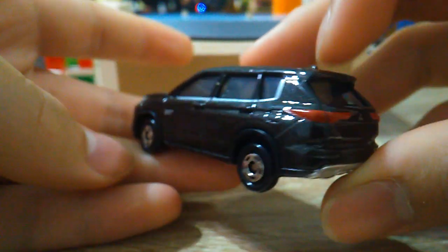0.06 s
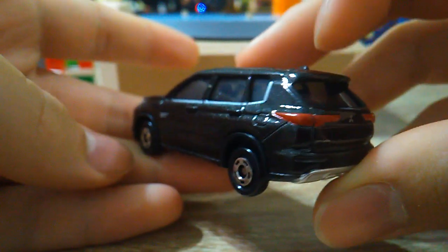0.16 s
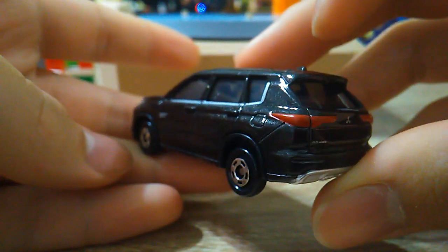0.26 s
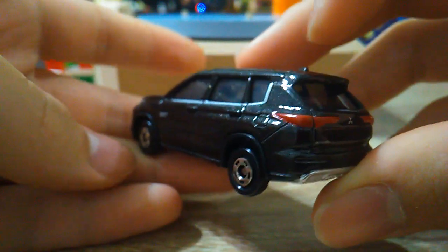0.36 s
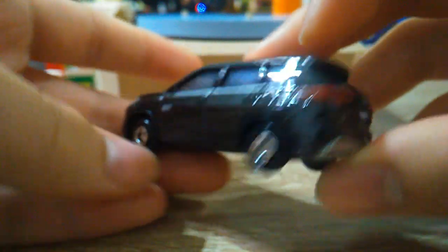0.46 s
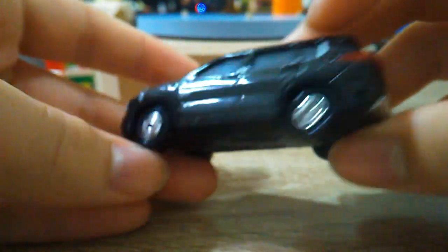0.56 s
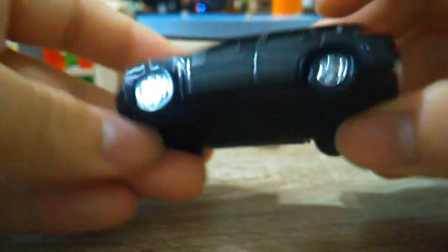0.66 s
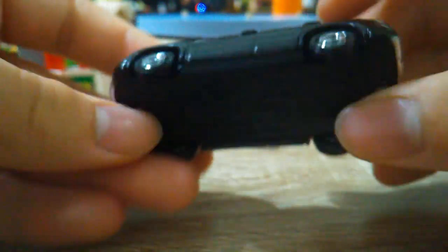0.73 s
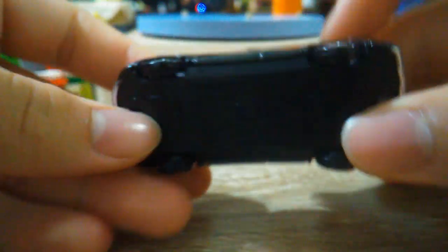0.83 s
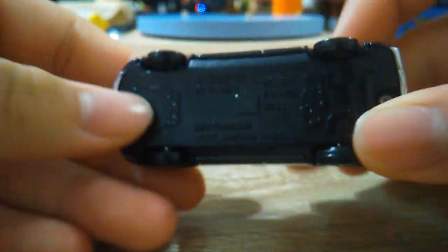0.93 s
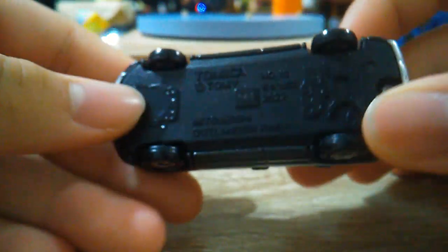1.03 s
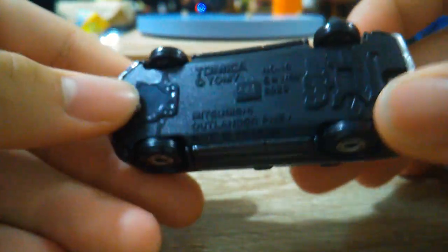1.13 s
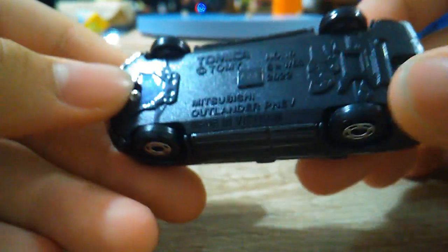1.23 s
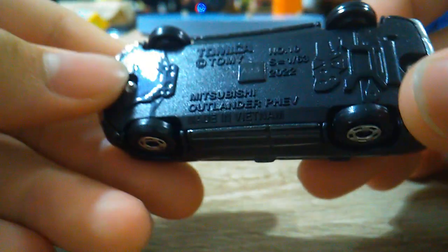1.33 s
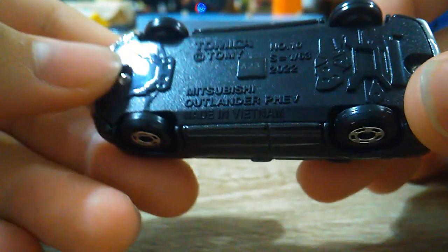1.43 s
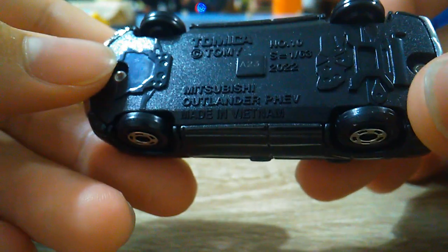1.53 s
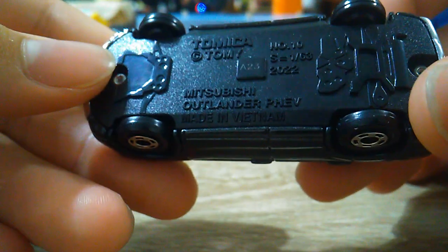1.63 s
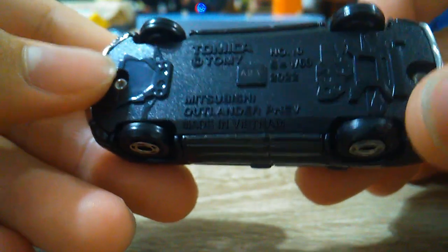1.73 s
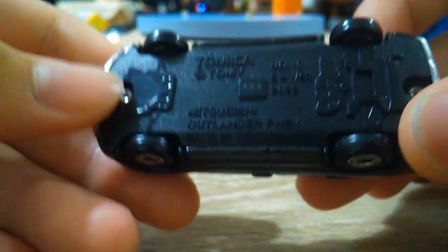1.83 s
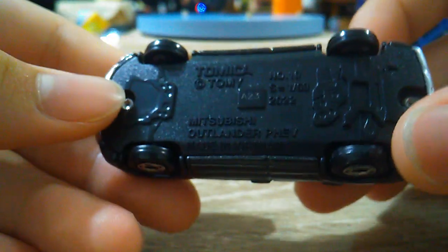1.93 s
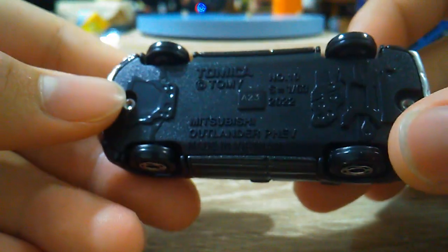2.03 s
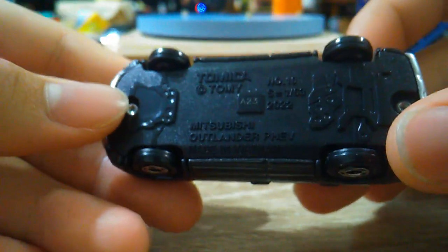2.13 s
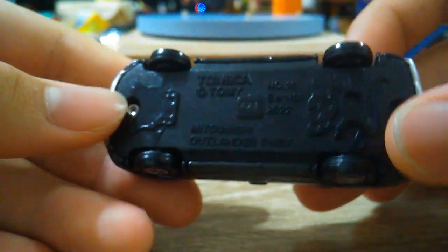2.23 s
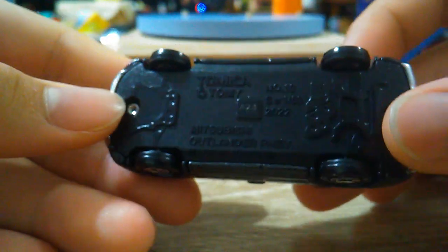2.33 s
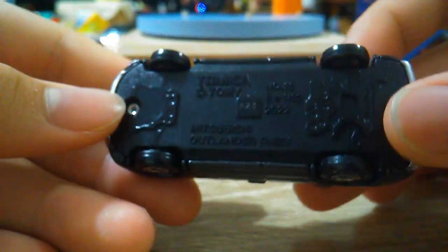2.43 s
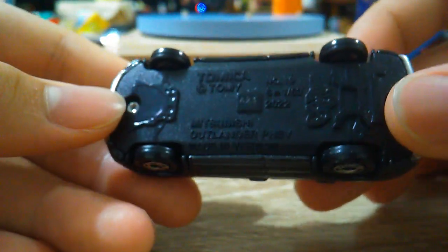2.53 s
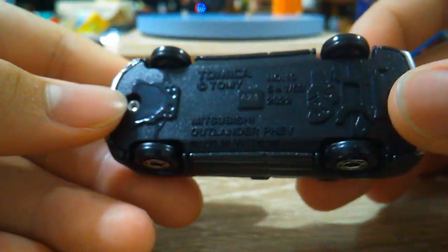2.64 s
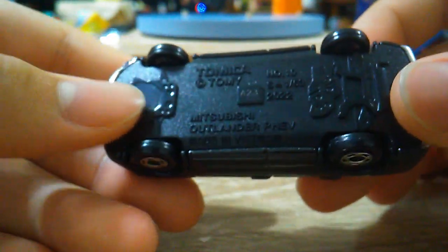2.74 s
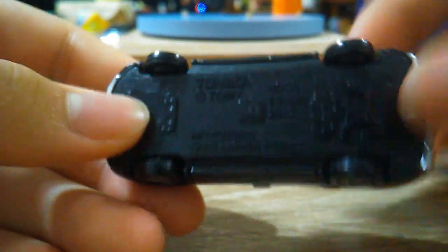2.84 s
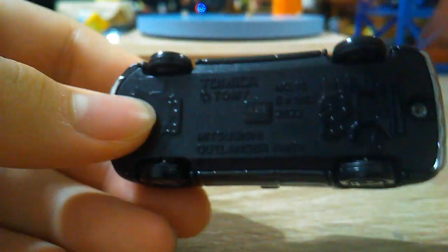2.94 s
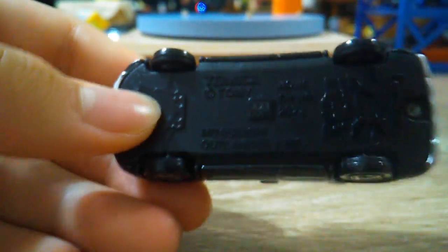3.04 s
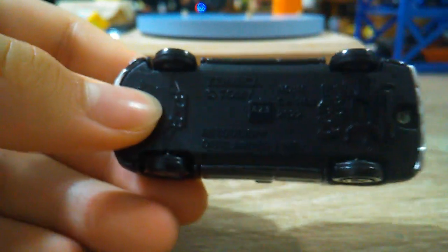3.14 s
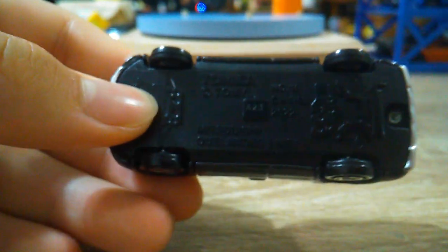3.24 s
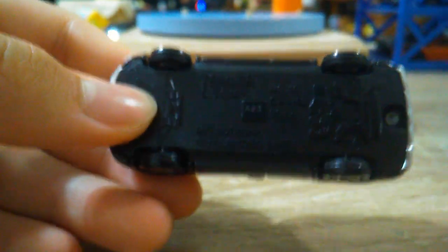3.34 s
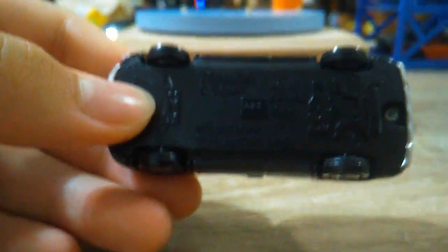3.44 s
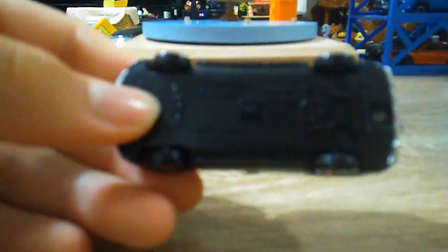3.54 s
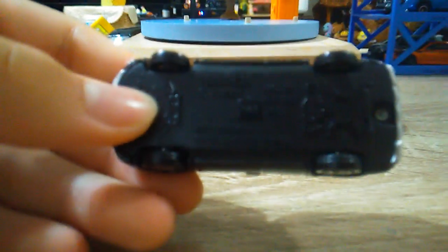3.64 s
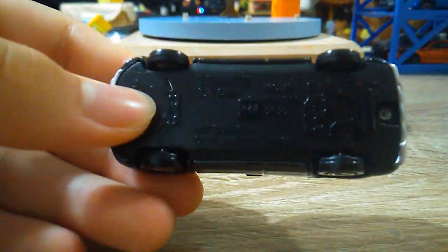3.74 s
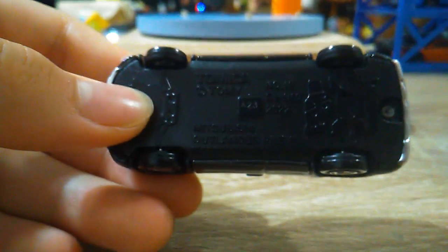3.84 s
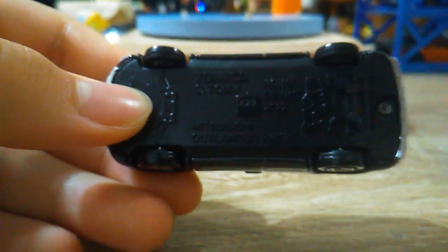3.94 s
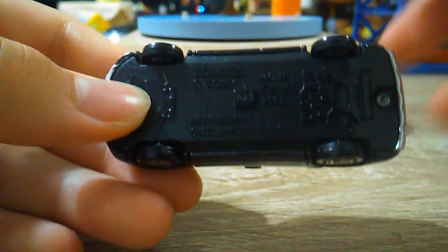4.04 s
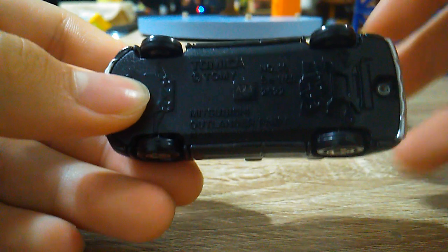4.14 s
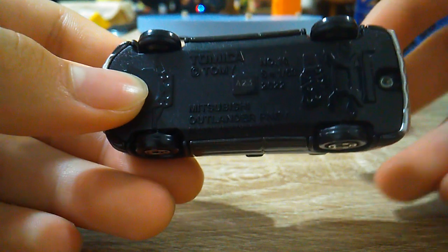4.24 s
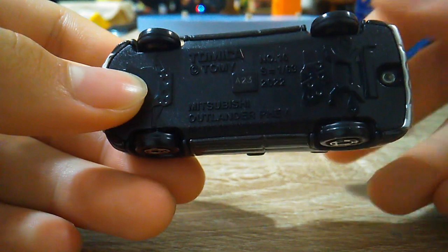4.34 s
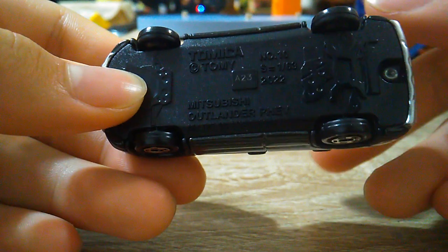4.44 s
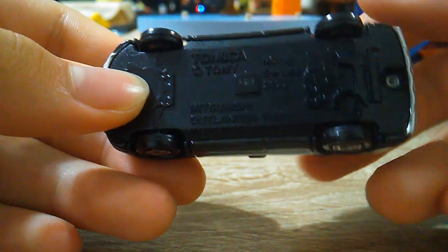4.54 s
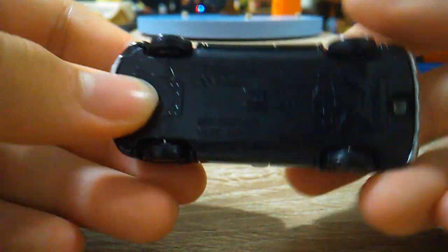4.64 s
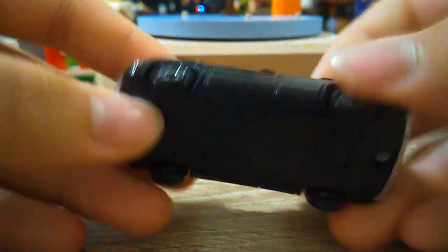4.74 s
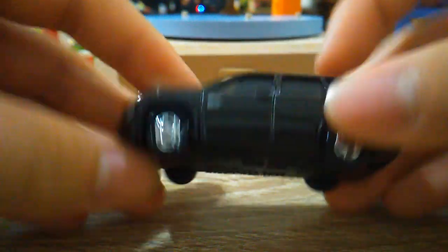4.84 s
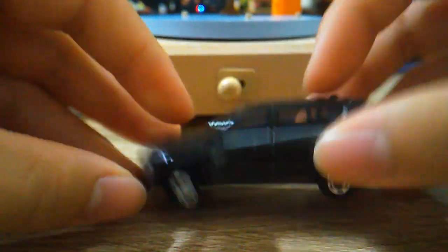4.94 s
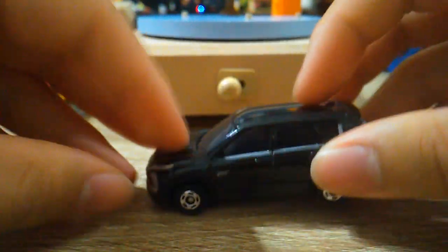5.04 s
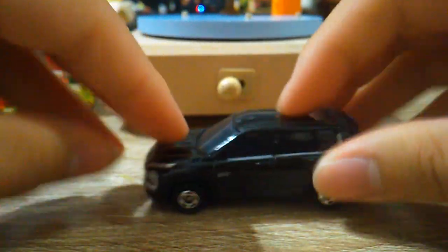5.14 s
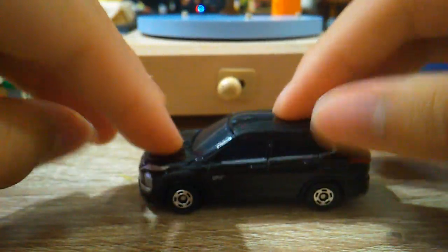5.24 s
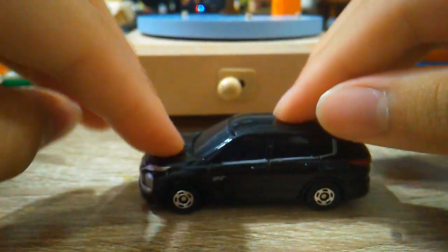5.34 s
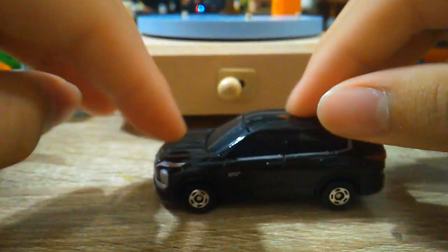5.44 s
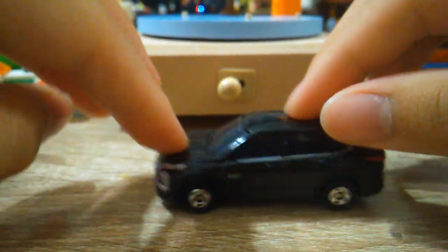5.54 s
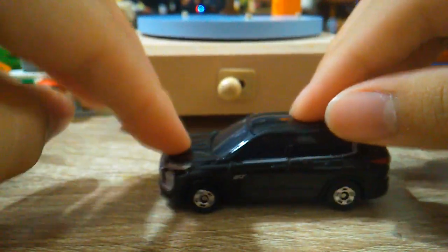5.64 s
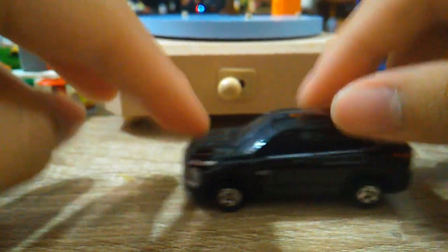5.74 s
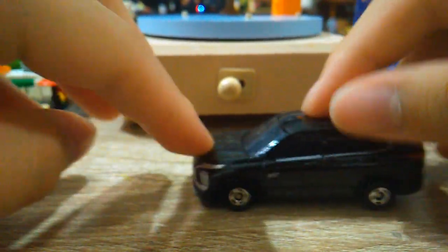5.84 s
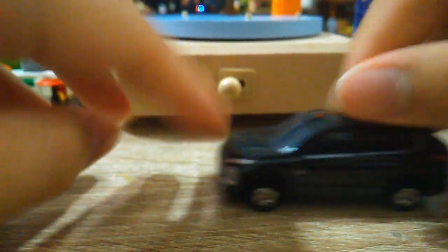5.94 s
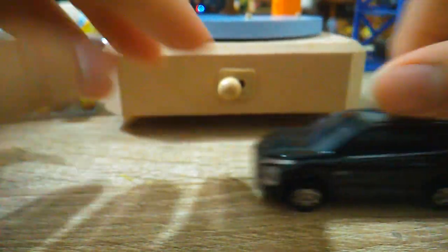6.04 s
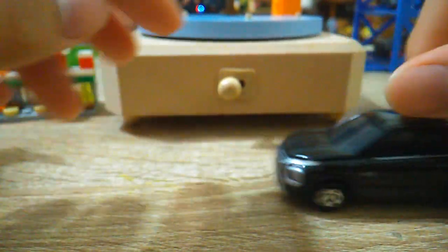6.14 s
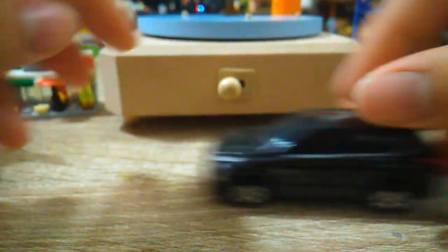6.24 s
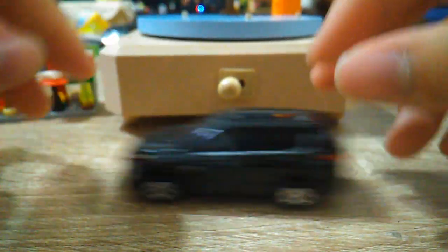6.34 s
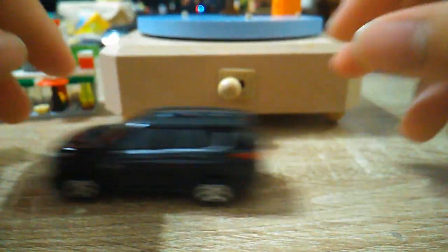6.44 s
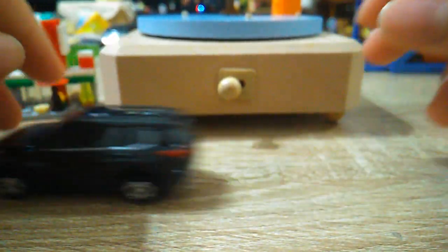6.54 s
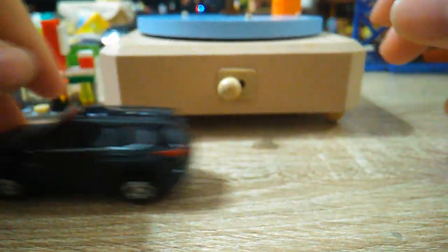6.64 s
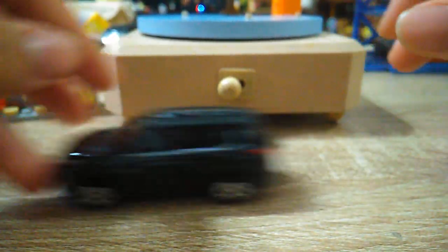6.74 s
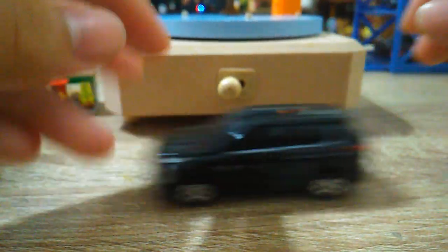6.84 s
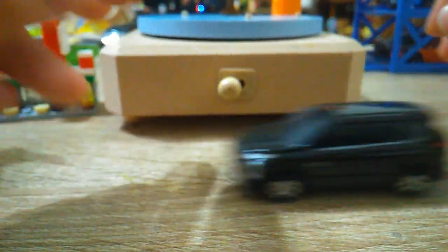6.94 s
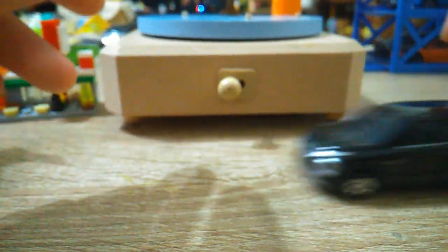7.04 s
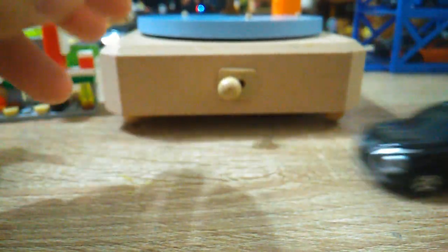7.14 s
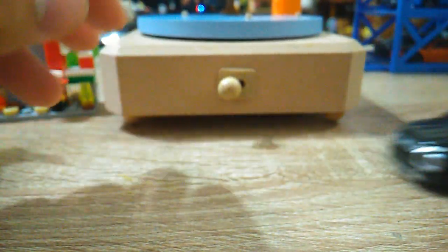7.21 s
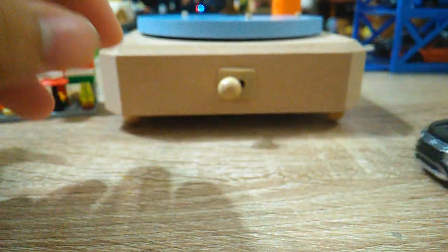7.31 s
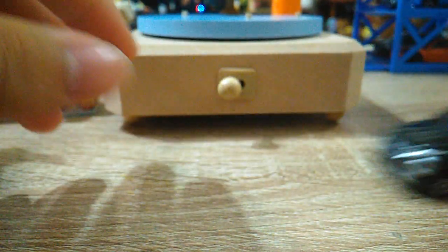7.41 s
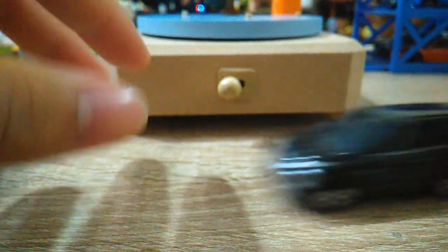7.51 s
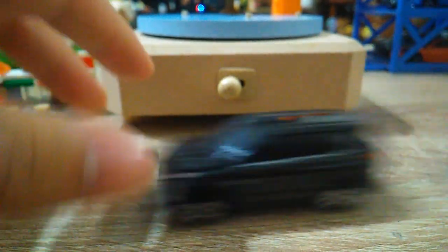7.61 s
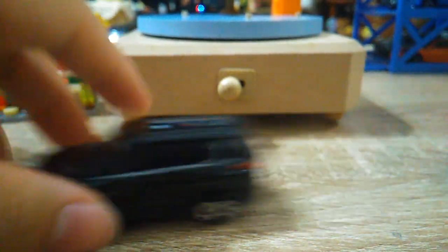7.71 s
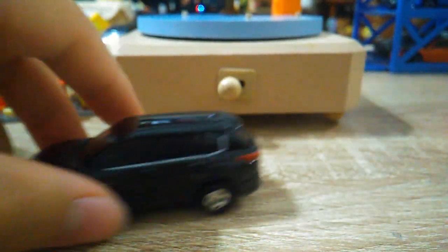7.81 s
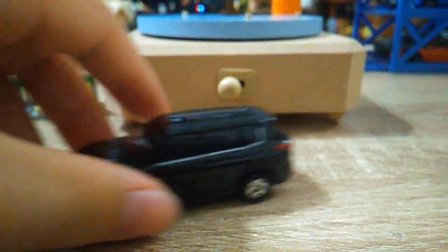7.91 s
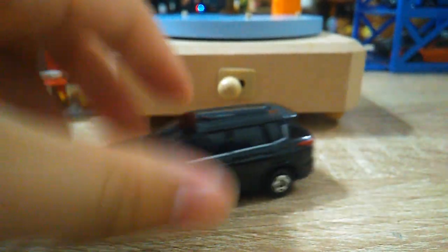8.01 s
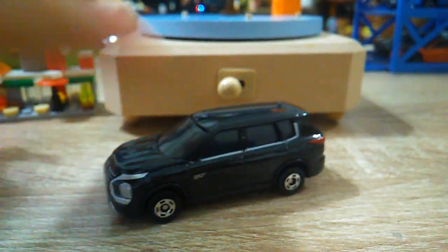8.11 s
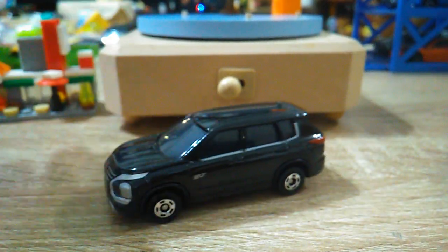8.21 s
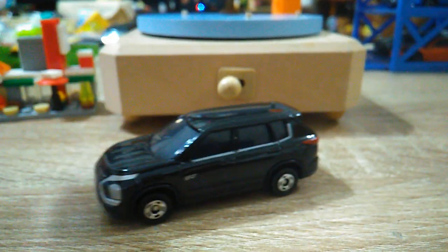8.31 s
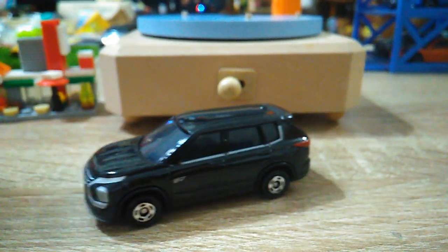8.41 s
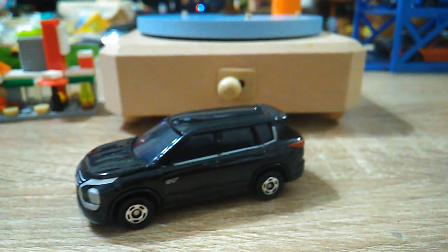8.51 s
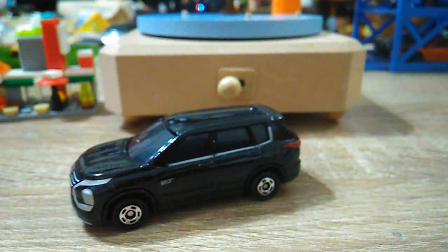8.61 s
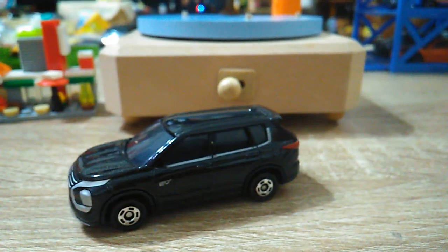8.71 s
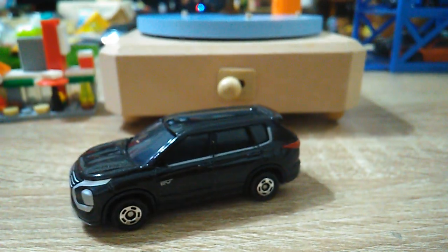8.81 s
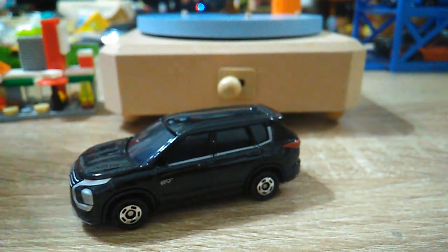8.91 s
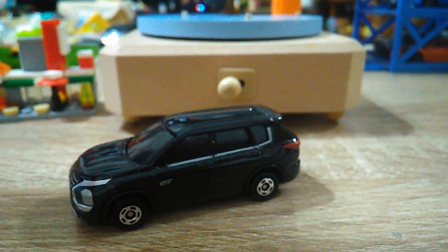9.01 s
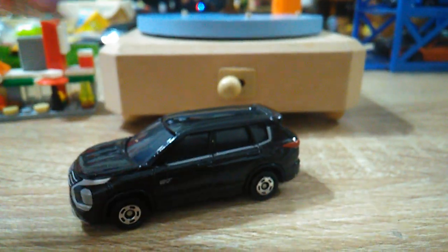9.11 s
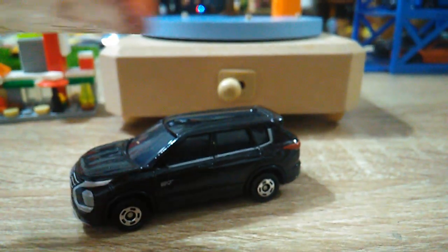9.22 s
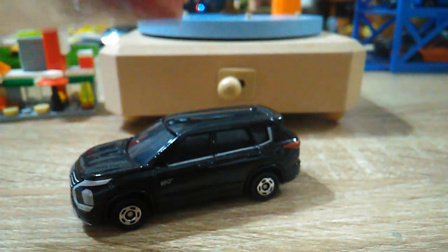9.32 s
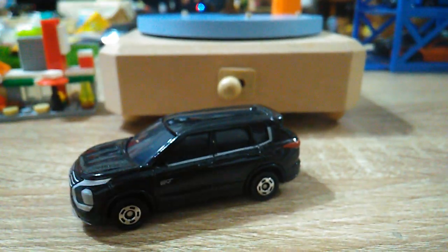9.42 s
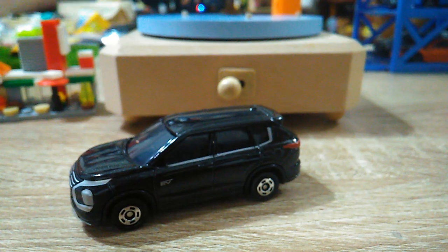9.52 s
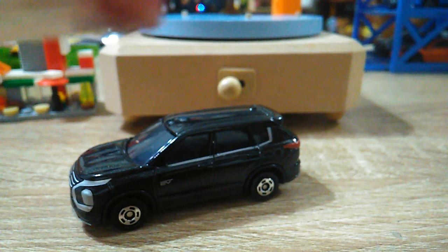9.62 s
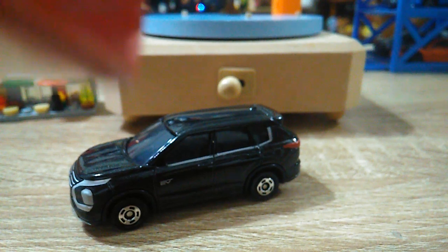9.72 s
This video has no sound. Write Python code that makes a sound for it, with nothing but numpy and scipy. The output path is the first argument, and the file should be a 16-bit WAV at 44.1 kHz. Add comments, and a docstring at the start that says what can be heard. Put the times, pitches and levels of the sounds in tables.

```python
"""Quiet room, wooden table: a small die-cast toy car is turned over in the fingers, set down and rolled to and fro.
Loose axles click: bursts of noise through the body's resonances. Wheels knock: short pushes excite tabletop modes.
Rolling wheels rasp: grain ticks and noise ring in the body, while the car bobs on its axles and the board rumbles.
Fingers rub (hissing noise strokes), the table is bumped (low noise bursts), and soft knocks come from further off.
"""
import sys
import numpy as np
from scipy import signal
from scipy.fft import rfft, irfft, next_fast_len
from scipy.io import wavfile
from scipy.ndimage import map_coordinates

SR = 44100
rng = np.random.default_rng(int(sys.argv[2]) if len(sys.argv) > 2 else 0)


def bounce(signal):
    """Save signal as a 16-bit WAV file at the path given by the first command-line argument."""
    frames = np.transpose(np.atleast_2d(signal))
    limited = np.clip(frames, -1, 1)
    pcm = np.round(limited * 32767).astype(np.int16)
    wavfile.write(sys.argv[1], SR, pcm)


N = 430857
TIME = np.arange(N) / SR

# Levels below are relative; the source functions add their mix gains.
# Spectra: points of a density; absolute height drops out, as coloured() sets rms 1.

# quiet of the room, spectrum: f/Hz, density/dB
QUIET_SPECTRUM = [(40, 4), (65, 0), (95, -5), (430, -13), (860, -19), (1300, -26.5), (2200, -28),
                  (5000, -37.5), (10900, -23.5), (12800, -39), (15500, -32)]
# correlation of the two microphone ports: f/Hz, likeness/1
PORT_LIKENESS = [(60, 0.69), (130, 0.71), (290, .72), (640, 0.43), (1400, -0.33), (3100, 0.12),
                 (15000, -0.063)]
# colour of the room echo: f/Hz, level/dB
ECHO_SPECTRUM = [(80, -5.5), (400, -1.5), (1000, -5.5), (3000, -4.5), (8000, -8.5), (15000, -15)]
# knocks further off in the room: t/s, level/dB
FAR_KNOCKS = [(0.197, -57), (0.798, -58.5), (1.858, -59), (2.454, -42.5), (3.062, -44.5), (3.7, -41.5),
              (3.912, -57.5), (4.336, -58), (4.914, -50)]
# room sound of a far knock, spectrum: f/Hz, density/dB
FAR_SPECTRUM = [(250, -4.5), (420, -6), (580, -3.5), (800, 1), (1150, -3.5), (1450, -15), (2100, -9),
                (3100, -17.5), (4200, -18.5), (5500, -29)]

# soft bumps of a hand on the table: t/s, level/dB, middle re level/dB, deep re level/dB
TABLE_BUMPS = [(0.166, -46, -11, 11.5), (0.204, -51.5, -6, 21), (0.33, -54.5, -25, 20.5),
               (0.796, -52.5, 10.5, -4), (0.882, -44.5, -5, 2), (3.554, -31.5, -24, 4),
               (3.582, -36, -16, 3), (4.868, -31.5, -28, 0), (5.268, -39, -18, 6), (7.884, -35, 11, 1),
               (8.089, -16.5, -5, -7), (8.243, -32.5, 6.5, -4), (8.417, -26.5, 7, -6),
               (8.447, -23, 0, -5.5), (8.826, -38, -0.5, -1), (9.177, -14.5, -5, -13)]
# deep sway of a bumped table, spectrum: f/Hz, density/dB
BUMP_SWAY_SPECTRUM = [(33, -7), (48, -0.5), (68, 0.5), (85, -11)]
# low boom of a bumped table, spectrum: f/Hz, density/dB
BUMP_BOOM_SPECTRUM = [(70, -1.5), (105, 4), (140, -4), (190, -8.5), (260, -13)]
# a hand's bump heard in the board, spectrum: f/Hz, density/dB
BUMP_NOTE_SPECTRUM = [(170, -7.5), (250, -7), (310, 2), (370, -8), (445, -5), (560, -13.5), (830, -25.5),
                      (1000, -14.5), (1500, -22), (2750, -26), (3800, -32.5)]

# fingers sliding on paint and wood: t/s, length/s, hiss/dB, rub/dB
FINGER_STROKES = [(0.18, 0.28, -55.5, -57.5), (0.59, 0.74, -57.5, -53.5), (1.793, 0.31, -59, -58),
                  (2.432, 0.35, -56, -50), (2.725, 0.22, -55, -60), (2.948, 0.2, -40.5, -53),
                  (3.068, 0.27, -51.5, -50), (3.307, 0.27, -54.5, -58.5), (3.448, 0.24, -55.5, -53),
                  (3.662, 0.3, -48.5, -46), (3.942, 0.33, -53, -54), (4.33, 0.35, -51.5, -56),
                  (4.608, 0.21, -51.5, -53.5), (4.83, 0.3, -51, -46.5), (8.5, 0.27, -63, -53),
                  (8.627, 0.26, -51.5, -47), (8.77, 0.24, -49, -45), (8.887, 0.26, -40.5, -38.5),
                  (9.097, 0.49, -55, -53)]
# hiss of sliding skin, spectrum: f/Hz, density/dB
SKIN_HISS_SPECTRUM = [(4500, -17.5), (8600, -3), (11400, -0.5), (12600, -26.5), (14200, -18), (15300, -13)]
# lower rub of sliding skin, spectrum: f/Hz, density/dB
SKIN_RUB_SPECTRUM = [(500, -5), (760, -9.5), (1250, -11.5), (2500, -9.5), (6000, -22)]

# a wheel or the sill touches the board; a drop is a quick run of touches: t/s, push/dB, pitch f/Hz
LANDINGS = [(5.135, -27, 447), (5.2275, -15, 654), (5.4006, -9.5, 626), (5.4099, -5, 524),
            (5.417, -5.5, 800), (5.4228, -11, 720), (5.7035, -5.5, 585), (5.7083, -8.5, 615),
            (5.7134, -12.5, 630), (5.7797, -18.5, 515), (5.9382, -4.5, 640), (5.9422, -4, 556),
            (5.9474, -4.5, 600), (7.889, -28, 600), (7.997, -22, 650), (8.0884, -20, 328),
            (8.1905, -24, 700), (8.419, -13.5, 340), (8.4482, -17, 296), (8.4548, -20, 420),
            (8.4615, -12, 403), (8.4725, -23, 400), (8.974, -29.5, 590), (9.184, -15.5, 476)]
# tabletop modes: f/Hz, level/dB, t60/s
TABLE_MODES = [(180, -24.5, 0.045), (235, -33.5, 0.1), (303, -28, 0.076), (426.4, -12, 0.035),
               (439, -34, 0.16), (482, -26.5, 0.16), (800, -23.5, 0.0096), (982, -38, 0.09)]
# thud of the many weak board modes, spectrum: f/Hz, density/dB
THUD_SPECTRUM = [(150, 3), (400, 0.5), (800, -6), (1100, -14), (1500, -15.5)]

# the car is pushed and coasts until a finger stops it: t/s, length/s, push/s, rasp/dB, rumble/dB
RUNS = [(6.248, 0.496, 0.17, -31.5, -35), (6.759, 0.67, 0.094, -29.5, -35.5),
        (7.507, 0.39, 0.14, -23.5, -32)]
# wheels scrape as fingers shift the car: t/s, length/s, rasp/dB, treble hiss/dB, board/dB, rumble/dB
SCRAPES = [(5.12, 0.014, -30.5, -32.5, -40.5, -49.5), (5.261, 0.022, -31, -34.5, -42, -31.5),
           (5.515, 0.089, -35, -36.5, -31.5, -35), (5.814, 0.091, -27.5, -27, -28.5, -32.5),
           (6.033, 0.059, -23, -23.5, -20, -34.5), (6.098, 0.12, -43.5, -51, -40.5, -36),
           (7.866, 0.059, -29.5, -24.5, -26.5, -37.5), (7.98, 0.16, -34, -30.5, -28, -44),
           (8.078, 0.017, -23.5, -17, -31.5, -34), (8.222, 0.035, -34.5, -29.5, -29, -44.5),
           (8.303, 0.046, -43, -33.5, -37, -51.5), (8.39, 0.033, -34, -29, -25.5, -51),
           (8.446, 0.008, -32, -30, -22, -26)]
# a wheel jumps at a ridge in the wood: t/s, level/dB
JOLTS = [(5.864, 3), (5.887, 2), (5.907, 1.5), (5.927, 3.5), (6.357, 11), (6.41, 4), (6.461, 10),
         (6.61, 1.5), (6.852, 9), (6.985, 7), (7.009, 5), (7.09, 3), (7.195, 4.5), (7.208, 11.5),
         (7.397, 8), (7.614, 10.5), (7.625, 3.5), (7.641, -0.5), (7.683, 3), (7.702, 5), (7.7133, 9),
         (7.7253, 8.5), (7.766, 6), (7.786, 4.5)]
# wheel rasp, spectrum: f/Hz, density/dB
RASP_SPECTRUM = [(1200, -9), (1850, -10.5), (2250, -5), (3300, -3), (4400, -4.5), (5400, -11), (6500, -13)]
# treble hiss of the wheels, spectrum: f/Hz, density/dB
HISS_SPECTRUM = [(6500, -2), (7500, -1), (8500, 2.5), (10900, 4), (11500, -0.5), (12700, -20.5),
                 (14000, -15.5), (15200, -2.5), (16000, -27)]
# board under scraping wheels, spectrum: f/Hz, density/dB
BOARD_SPECTRUM = [(160, 2.5), (230, -1), (330, -2.5), (560, -10.5), (800, -4.5), (1150, -9.5),
                  (1700, -17.5)]
# dull shaking of the board, spectrum: f/Hz, density/dB
RUMBLE_SPECTRUM = [(40, -22.5), (65, -3), (95, 0), (150, -6), (220, -23)]

# where the car is between the ports: t/s, left re right level/dB
CAR_SIDE = [(.6, 2.5), (3.6, 8.5), (5.1, 0), (5.55, 3.5), (6.15, 0), (6.6, 2), (7.3, -1.5), (7.75, 0.5),
            (8.1, 0), (9.7, 2.5)]
# resonances of die-cast body and plastic base: f/Hz, width/Hz, level/dB
CAR_MODES = [(2290, 140, -1.5), (2780, 270, -7.5), (3130, 130, -8), (3960, 87, -4), (4300, 140, -10),
             (5150, 220, -4.5), (6535, 470, -4.5), (8100, 100, -8.5), (8840, 180, -4), (9760, 220, -5.5),
             (10600, 180, 0.5), (11310, 220, 0.5)]
# axles and wheels clicking in the body, and near 0.62 s a fingernail scraping the car; each click rings one
# resonance: # t/s, level/dB, treble re level/dB, low ring re level/dB, resonance f/Hz, resonance level/dB
CLICKS = [(0.615, -35, 6.5, -19, 11400, -23), (0.627, -33, 9.5, -10, 1550, -51),
          (0.633, -35, 2.5, -19, 4240, -28.5), (0.8337, -16, -13, -26, 2510, -43),
          (0.892, -39, -8, -3, 3070, -44), (1.006, -42.5, -9, -4, 2370, -50),
          (1.052, -44, -18, -10, 1550, -55), (1.7912, -31, -14, 4, 1250, -52),
          (3.5317, -38, 3.5, 1, 2180, -50), (3.553, -46, 10, 10, 1160, -44),
          (3.653, -44, 14.5, 8, 9250, -47), (3.746, -48, 12.5, -6, 8450, -38),
          (4.019, -45.5, 4, -16, 8420, -48), (4.851, -35.5, -6, -23, 2290, -39),
          (4.883, -27.5, -6.5, -21, 1490, -42), (4.912, -28.5, -3, -23, 4300, -34),
          (5.067, -37, -7, -7, 2840, -35), (5.1013, -6.5, -2.5, -9, 4300, -19.5),
          (5.1354, -14, -4, -25, 11100, -14.5), (5.174, -22, -14, 0.5, 3700, -27),
          (5.2277, -23.5, -1, 1, 4000, -30), (5.248, -16.5, 3, -12, 8700, -11),
          (5.255, -9.5, -3.5, -4, 3960, -18), (5.372, -34, -9, 4, 710, -35),
          (5.41, -18.5, -3.5, -17, 1380, -36), (5.418, -22, -10, -10, 765, -9),
          (5.521, -16.5, -5.5, -12, 1570, -40), (5.532, -19, -8, -7, 1480, -39),
          (5.562, -19.5, 3, -18, 3130, -17), (5.575, -14, -7, -6, 3780, -39),
          (5.704, -18.5, -4, -2, 3140, -24.5), (5.806, -20.5, -4.5, 2, 3170, -24),
          (5.821, -17, -7, -15.5, 3210, -18), (5.838, -14, -5, -4.5, 3370, -17),
          (5.94, -13, -4, 1, 804, -22), (6.083, -11, -2, -11, 11210, -22),
          (6.200, -29, -2.5, -14, 2270, -36), (6.308, -33.5, 7, -1, 11200, -45),
          (6.661, -29, 6.5, -11, 5750, -30), (6.674, -29.5, 3, -22, 5940, -25),
          (6.970, -17.5, -5, -18, 2240, -33), (7.073, -23.5, 1, -16, 2740, -31),
          (7.131, -23, -3, -15, 3820, -22.5), (7.277, -25.5, 3.5, -10, 8760, -19),
          (7.37, -26, -1.5, -27, 3620, -28), (8.089, -5, -10, -11, 8040, -6),
          (8.098, -17, 1, -2, 11270, -4), (8.108, -15.5, 1, -10, 9130, -6.5),
          (8.117, -13, 0, -27, 3200, -11.5), (8.151, -16.5, 2.5, -7, 3030, -16),
          (8.189, -23.5, -4, 4.5, 3120, -19.5), (8.197, -24.5, 5.5, 4.5, 7080, -25),
          (8.252, -21, 8, -17, 7350, -26), (8.266, -25, -9, -27.5, 3200, -18),
          (8.283, -25.5, 1, -12, 8800, -21), (8.4469, -16.5, -3, 1.5, 970, -27),
          (8.454, -22, -2, 2, 990, -29), (8.818, -32, 7, -10, 810, -34), (8.9, -47.5, 16.5, 3, 10200, -43),
          (8.975, -31.5, -11, 2, 693, -28.5), (9.027, -45, 17, -13, 7000, -42),
          (9.181, -27.5, -17, -16, 970, -50), (9.331, -43.5, -7, 2, 712, -43),
          (9.614, -55, -12.5, -2.5, 3050, -46), (9.735, -35.5, 2, -5.5, 833, -32)]
# hollow ring of the plastic base, spectrum: f/Hz, density/dB
CLICK_LOW_SPECTRUM = [(430, -8), (720, -13), (850, 4), (1000, -2.5), (1300, -3.5), (1900, -6)]
# sharp contact of axle and slot, spectrum: f/Hz, density/dB
CLICK_MIDDLE_SPECTRUM = [(1800, -2.5), (2600, 2), (3500, 3), (4400, -2.5), (5800, -2)]

QUIET_DB = -59.5
STROKE_RISE = 0.31   # share of a stroke spent speeding up
GRIP_HISS_DB, GRIP_RUB_DB = -70, -69.5   # skin resting on the car

BOARD_FILL = 0.26   # a mode spreads over the board in this share of its t60
KNOCK_SPREAD = 1.4   # a touch spans this ratio above and below its pitch
CAUGHT_S, CAUGHT_RING_DB = 6.6, -7.5   # the hand on the caught car damps the board's ring

FRICTION_PER_S = 1   # share of top speed lost each second of coasting
STOP_T60_S = 0.045
RUN_HISS_DB, RUN_BOARD_DB = -4.5, -15   # re the rasp column
RASP_POWER, HISS_POWER, RUMBLE_POWER = 1.51, 2.4, 0.93   # exponents of speed
SCRAPE_ATTACK_S, SCRAPE_T60_S = 0.011, 0.21
PRESSED_FROM_S, PRESSED_UNTIL_S = 5.1, 8.55   # wheels creep faintly while pressed on the board
CREEP_DB = (-51, -53, -60.5, -52)   # rasp, treble hiss, board, rumble
BOARD_SPLIT_HZ, BOARD_LOW_DB = 350, -10   # board follows rumble below the split, scraping above
SPRING_HZ, SPRING_DB, SHAKE_DB = 82.9, 2, -4.5   # bob on the wire axles; bob tone and dull shaking
RATTLE_DB, RATTLE_SPREAD_DB = -2, 3   # loose wheels chatter once in each bob

HELD_UNTIL_S = 5   # fingers around the body cut clicks short
CLICK_LEAD_S = 0.0023   # chatter starts before the axle seats
TREBLE_SIDE_DB = -4   # click treble leans right
RING_T60_S, RING_SHORTENS = 0.027, 0.13   # t60 at 3 kHz; falls with this power of frequency
RING_BUILD_S, RING_PHASE_SPREAD = 0.0029, 0.83   # chatter pumps the ring up; port phase spread/rad


def from_db(db):
    """Decibels to gain."""
    return 10 ** (np.asarray(db) / 20)


def rms_one(x):
    """Scale to unit power."""
    return x / np.sqrt(np.mean(x ** 2) + 1e-20)


def at_hz(points, hz):
    """Read a table on a log-frequency axis."""
    f, value = np.transpose(points)
    return np.interp(np.log(hz + 1), np.log(f), value)


def band(x, kind, hz, order=2):
    """Butterworth filter."""
    sos = signal.butter(order, np.clip(hz, 10, .45 * SR), kind, fs=SR, output="sos")
    return signal.sosfilt(sos, x + 1e-18)


def white():
    """Unrelated noise for the two channels."""
    return rng.standard_normal((2, N))


def coloured(x, spectrum):
    """Give two signals a spectrum with steep skirts and mix them to the likeness of the ports; rms 1."""
    size = next_fast_len(N)
    hz = np.arange(size // 2 + 1) * SR / size + 1
    skirts = np.minimum(1, hz / spectrum[0][0]) ** 4 * np.minimum(1, spectrum[-1][0] / hz) ** 8
    mid, side = rfft(x, size) * from_db(at_hz(spectrum, hz)) * skirts
    alike = at_hz(PORT_LIKENESS, hz)
    ports = np.sqrt(1 + alike) * mid + np.sqrt(1 - alike) * side * [[1], [-1]]
    return rms_one(irfft(ports, size)[:, :N])


def flutter(rate_hz, depth_db):
    """A gain that wanders at random; rms 1."""
    hop = 16   # samples per control point
    slow = band(rng.standard_normal(N // hop + 2), "low", rate_hz * hop)
    gain = rms_one(from_db(depth_db * rms_one(slow)))
    return np.interp(np.arange(N) / hop, np.arange(len(slow)), gain)


def patchy(x, width_hz, seconds, depth_db):
    """As the contact point moves, many small resonances come and go: a random time-frequency gain; rms 1."""
    hz, t, z = signal.stft(x, SR, nperseg=512)
    where = np.meshgrid(hz / width_hz, t / seconds, indexing="ij")
    field = map_coordinates(rng.standard_normal((256, 1024)), where, order=1)
    return rms_one(signal.istft(z * from_db(depth_db * field), SR)[1][:, :N])


def pan(db):
    """Left and right gains; positive leans left."""
    return from_db(np.array([[1], [-1]]) * db / 2)


def strikes(times, heights):
    """One impulse per event."""
    out = np.zeros(N)
    at = np.clip(np.round(np.asarray(times) * SR).astype(int), 0, N - 1)
    np.add.at(out, at, heights)
    return out


def bursts(times, db, rise, t60, tail_db, tail_t60):
    """Envelope of events that swell, die quickly and leave a weaker tail; their powers add."""
    t = TIME[:SR]
    swelling = np.minimum(t / rise, 1)
    shape = swelling ** 2 * from_db(-60 * np.maximum(t - rise, 0) / t60)
    shape = shape + swelling * from_db(tail_db - 60 * t / tail_t60)
    power = signal.oaconvolve(strikes(times, from_db(db) ** 2), shape ** 2)[:N]
    return np.sqrt(np.abs(power))


def swell(start, length, attack, t60):
    """Attack, hold and release of one movement, as a gain in time."""
    t = TIME - start
    return np.clip(t / attack, 0, 1) * from_db(-60 * np.clip((t - length) / t60, 0, 2))


def ringing_out(hz, t60, build, phase=0):
    """One resonance builds up and dies away; half a second of it."""
    t = TIME[:SR // 2]
    envelope = np.minimum(t / build, 1) * from_db(-60 * np.maximum(t - build, 0) / t60)
    return envelope * np.sin(2 * np.pi * hz * t + phase)


def room_quiet():
    """Steady coloured noise of the quiet room."""
    return from_db(QUIET_DB) * coloured(white(), QUIET_SPECTRUM)


def room(x, t60, wet_db):
    """A diffuse noise tail after a gap of about a millisecond, partly alike at the ports."""
    t = TIME[:SR]
    tail = coloured(white(), ECHO_SPECTRUM)[:, :SR] * from_db(-60 * t / t60)
    tail *= np.clip(t / 0.0018 - .5, 0, 1)
    tail /= np.sqrt(np.sum(tail ** 2) / 2)
    return from_db(wet_db) * signal.oaconvolve(x, tail, axes=1)[:, :N]


def far_knocks():
    """Distant knocks: a short grainy crack, then mostly room sound, in a wandering colour."""
    s, db = np.transpose(FAR_KNOCKS)
    echoes = patchy(white(), width_hz=160, seconds=0.047, depth_db=6) * flutter(rate_hz=300, depth_db=2)
    crack = bursts(s, db - 12.0, rise=0.0021, t60=0.071, tail_db=-30, tail_t60=0.1)
    reply = bursts(s, db, rise=0.0071, t60=0.28, tail_db=-0.5, tail_t60=0.31)
    return crack * coloured(echoes, RASP_SPECTRUM) + reply * coloured(echoes, FAR_SPECTRUM)


def table_bumps():
    """Flesh on wood: a deep sway of the table, a low boom and a hollow note, as decaying noise bands."""
    s, db, middle_db, deep_db = np.transpose(TABLE_BUMPS)
    sway = bursts(s, db + deep_db, rise=0.0077, t60=0.2, tail_db=-23.0, tail_t60=0.4)
    boom = bursts(s, db, rise=0.00093, t60=0.26, tail_db=-19.5, tail_t60=0.29)
    note = bursts(s, db + middle_db, rise=0.0038, t60=0.13, tail_db=-13.0, tail_t60=0.42)
    low = sway * coloured(white(), BUMP_SWAY_SPECTRUM) + boom * coloured(white(), BUMP_BOOM_SPECTRUM)
    return from_db(-10.0) * low + from_db(-4.0) * note * coloured(white(), BUMP_NOTE_SPECTRUM)


def fingers():
    """Skin slides with a fine, uneven hiss; each stroke speeds up, then slows to rest."""
    s, length, hiss_db, rub_db = np.transpose(FINGER_STROKES)
    speed = np.array([np.interp(TIME, [a, a + STROKE_RISE * d, a + d], [0, 1, 0])
                      for a, d in zip(s, length)])
    hiss = np.hypot(from_db(hiss_db) @ speed, from_db(GRIP_HISS_DB))
    rub = np.hypot(from_db(rub_db) @ speed, from_db(GRIP_RUB_DB))
    slip = flutter(rate_hz=85, depth_db=1.37) * patchy(white(), width_hz=160, seconds=0.051, depth_db=6.0)
    hissing = from_db(-0.5) * hiss * coloured(slip, SKIN_HISS_SPECTRUM) * pan(-3.5)
    return hissing + from_db(-6.0) * rub * coloured(slip, SKIN_RUB_SPECTRUM)


def touch(hz):
    """The push of one contact on the board: a single dull swing of height 1."""
    dull = band(signal.unit_impulse(SR // 20), "low", hz * KNOCK_SPREAD, order=4)
    pulse = band(dull, "high", hz / KNOCK_SPREAD)
    return -pulse / np.abs(pulse).max()


def wheel_knocks(uneven_db=2, thud_db=-19):
    """A wheel lands: a dry push on the board, then strong modes ring amid a short thud of the weak ones."""
    s, db, pitch_hz = np.transpose(LANDINGS)
    board = np.zeros(N)
    for start, gain, hz in zip((s * SR).astype(int), from_db(db), pitch_hz):
        push = gain * touch(hz)
        board[start:start + len(push)] += push
    ring_db = db + CAUGHT_RING_DB * (s > CAUGHT_S)
    chances = rng.standard_normal((len(s), len(TABLE_MODES))).T
    for (hz, level_db, t60), chance in zip(TABLE_MODES, chances):
        hits = strikes(s, from_db(ring_db + level_db + uneven_db * chance))
        board = board - signal.oaconvolve(hits, ringing_out(hz, t60, BOARD_FILL * t60))[:N]
    thud = bursts(s, db + thud_db, rise=0.0014, t60=0.044, tail_db=-16.5, tail_t60=0.12)
    # the right port hears the board 0.22 ms later
    ports = np.array([board, np.interp(TIME - .00022, TIME, board)])
    return (ports + thud * coloured(white(), THUD_SPECTRUM)) * pan(2.2)


def car_side_db(times):
    """How far the car leans to the left port at these moments."""
    return np.interp(times, *np.transpose(CAR_SIDE))


def car_body(x, direct_db):
    """The body's resonances in parallel, beside the direct sound of the contact."""
    out = from_db(direct_db) * x
    for hz, width_hz, db in CAR_MODES:
        r = np.exp(-np.pi * width_hz / SR)
        poles = [1, -2 * r * np.cos(2 * np.pi * hz / SR), r * r]
        mode = (1 - r * r) / 2 * signal.lfilter([1, 0, -1], poles, x + 1e-18)
        out = out + from_db(db) * mode
    return out


def wheel_levels():
    """Gains of rasp, hiss, board, rumble: they follow speed in a run, pressure in a scrape; powers add."""
    pressure = np.array([swell(s, length, SCRAPE_ATTACK_S, SCRAPE_T60_S) for s, length, *_ in SCRAPES])
    power = from_db(np.transpose(SCRAPES)[2:]) ** 2 @ pressure ** 2
    pressed = (TIME > PRESSED_FROM_S) & (TIME < PRESSED_UNTIL_S)
    power += np.outer(from_db(CREEP_DB) ** 2, pressed)
    growths = (RASP_POWER, HISS_POWER, RASP_POWER, RUMBLE_POWER)
    for s, length, push, rasp_db, rumble_db in RUNS:
        coasting = np.clip(1 - FRICTION_PER_S * (TIME - s - push), 0, 1)
        speed = swell(s, length, push, STOP_T60_S) * coasting
        levels_db = (rasp_db, rasp_db + RUN_HISS_DB, rasp_db + RUN_BOARD_DB, rumble_db)
        for k, growth in enumerate(growths):
            power[k] += (from_db(levels_db[k]) * speed ** growth) ** 2
    return np.sqrt(power)


def bobbing():
    """The car bobs at a wandering rate, wheels chatter once a turn: bob tone and chatter envelope."""
    turns = np.cumsum(SPRING_HZ * flutter(rate_hz=7, depth_db=1.07)) / SR
    tops = TIME[1:][np.diff(np.floor(turns)) > 0]
    size_db = RATTLE_DB + RATTLE_SPREAD_DB * np.tanh(rng.standard_normal(SR)[:len(tops)])
    tone = rms_one(np.cos(2 * np.pi * turns) * flutter(rate_hz=12, depth_db=4.0))
    return tone, bursts(tops, size_db, rise=0.0014, t60=0.047, tail_db=-31, tail_t60=.04)


def wheel_ticks(per_s=900, spread_db=4, low_hz=2100, high_hz=5400, cycles=16, count=14):
    """Fine ticks of the loose wheels, each ringing briefly at one of several pitches; rms 1."""
    n = int(per_s * N / SR)
    when, pitch, size, sign, side = rng.random((20000, 5))[:n].T
    heights = from_db(spread_db * np.minimum(-np.log(1 - size), 2.5)) * np.sign(sign - .5)
    out = np.zeros((2, N))
    for k, hz in enumerate(np.geomspace(low_hz, high_hz, count)):
        mine = (pitch * count).astype(int) == k
        r = from_db(-60 * hz / (cycles * SR))   # down 60 dB after these cycles
        w = 2 * np.pi * hz / SR
        lags_s = (0, (side[mine] - .5) / hz)   # left, right
        ports = np.array([strikes(when[mine] * N / SR + lag, heights[mine]) for lag in lags_s])
        out += signal.lfilter([0, np.sin(w)], [1, -2 * r * np.cos(w), r * r], ports + 1e-18)
    return rms_one(out)


def rolling(grains_per_s=1200, spread_db=10.0):
    """Hard wheels tick over the wood grain; the ticks ring in the car and shake the board."""
    rasp, hiss, board, rumble = wheel_levels()
    bob, rattle = bobbing()
    # each ridge of the grain grates for about a millisecond
    sizes = from_db(spread_db * np.minimum(rng.exponential(1, N), 3))
    ticks = (rng.random(N) < grains_per_s / SR) * sizes
    ridges = rms_one(np.abs(band(ticks, "low", 130, order=1)))
    jolts = bursts(*np.transpose(JOLTS), rise=0.0038, t60=0.02, tail_db=-29, tail_t60=.05)
    bite = np.sqrt(1 + 2 * rattle ** 2 + 2 * jolts ** 2)
    scrape = patchy((ridges + 1.2) * bite * white(), width_hz=160, seconds=.03, depth_db=5.5)
    ringing = car_body(scrape, direct_db=0.5)
    grating = from_db(-2.0) * coloured(ringing, RASP_SPECTRUM)
    grating += from_db(-4.5) * rms_one(wheel_ticks() * bite)
    wheels = rasp * grating * pan(0.68) + hiss * coloured(ringing, HISS_SPECTRUM) * pan(-1.8)
    shaken = coloured(scrape, BOARD_SPECTRUM) * pan(1.0)
    wood = from_db(-1.0) * board * band(shaken, "high", BOARD_SPLIT_HZ, order=4)
    wood += from_db(BOARD_LOW_DB) * rumble * band(shaken, "low", BOARD_SPLIT_HZ, order=4)
    shake = from_db(SPRING_DB) * bob + from_db(SHAKE_DB) * coloured(white(), RUMBLE_SPECTRUM)
    return wheels * pan(car_side_db(TIME)) + wood + rumble * shake


def click_envelope(s, db, rise, free_t60, tail_db, free_tail_t60, held_share=0.6):
    """Bursts that die sooner while the car is held in the hand."""
    held = s < HELD_UNTIL_S
    return sum(bursts(s[mine], db[mine], rise, free_t60 * share, tail_db, free_tail_t60 * share)
               for mine, share in ((held, held_share), (~held, 1)))


def click_rings():
    """Each click leaves one resonance of the car ringing above the rest."""
    out = np.zeros((2, N + SR))
    for (s, *_, hz, db), chance in zip(CLICKS, rng.standard_normal((len(CLICKS), 2))):
        t60 = RING_T60_S * (3000 / hz) ** RING_SHORTENS
        port_phase = RING_PHASE_SPREAD * np.tanh(2 * chance[1]) * np.array([[1], [-1]])
        phase = np.pi * chance[0] + port_phase
        ring = from_db(db) * pan(car_side_db(s)) * ringing_out(hz, t60, RING_BUILD_S, phase)
        start = int(s * SR)
        out[:, start:start + ring.shape[1]] += ring
    return out[:, :N]


def axle_clicks():
    """Each click is a few milliseconds of chatter as an axle meets its slot; lower parts ring longer."""
    s, db, treble_db, low_db, *_ = np.transpose(CLICKS)
    side_db = car_side_db(s)
    ports_db = (db + side_db / 2, db - side_db / 2)
    lead = s - CLICK_LEAD_S
    middle = np.array([click_envelope(lead, d, rise=0.0036, free_t60=0.038, tail_db=-22.5, free_tail_t60=0.092)
                       for d in ports_db])
    treble = np.array([bursts(lead, d + treble_db, rise=0.0036, t60=0.012, tail_db=-22.0, tail_t60=0.11)
                       for d in ports_db])
    low = click_envelope(s, db + low_db, rise=0.0012, free_t60=0.024, tail_db=-17.5, free_tail_t60=0.17)
    # chatter: tiny uneven impacts, as fluttering noise
    contact = patchy(white(), width_hz=170, seconds=0.056, depth_db=4.0) * flutter(rate_hz=410, depth_db=2.0)
    chatter = from_db(-2.5) * middle * coloured(contact, CLICK_MIDDLE_SPECTRUM)
    bright = rms_one(band(contact, "band", [6300, 13000]))
    chatter += from_db(5.0) * treble * bright * pan(TREBLE_SIDE_DB)
    ringing = car_body(chatter, direct_db=-5.0)
    ringing = band(ringing, "low", 11260, order=10) + from_db(-3.0) * band(ringing, "high", 15000, order=4)
    return ringing + from_db(-6.5) * low * coloured(contact, CLICK_LOW_SPECTRUM)


def scene():
    """The car and table close by, over the quiet of the room."""
    near = table_bumps() + wheel_knocks() + rolling() + click_rings() + axle_clicks()
    echo = room(near, t60=0.18, wet_db=-15.0)
    return room_quiet() + far_knocks() + echo + fingers() + near


def record(dry):
    """Shed the deepest bass, clip the loudest peaks, cut the top steeply."""
    clipped = np.clip(band(dry, "high", 36, order=4), -.8, .8)
    top_cut = signal.ellip(10, .1, 80, 16300, fs=SR, output="sos")   # ripple/dB, stop/dB, edge/Hz
    return signal.sosfilt(top_cut, clipped)


dry = scene()
out = record(dry)
bounce(out)
```